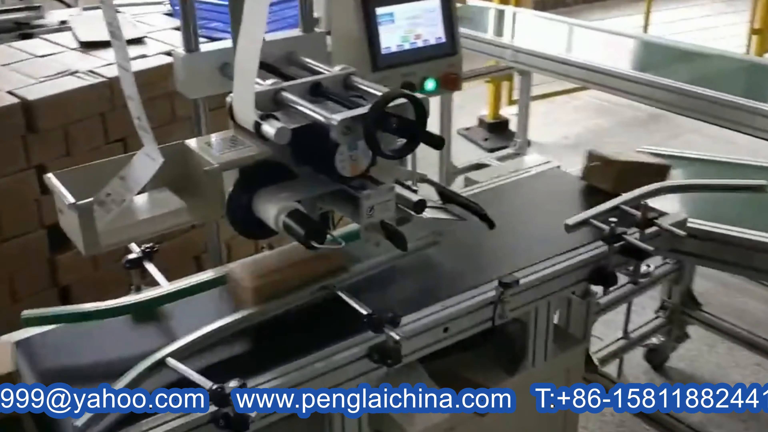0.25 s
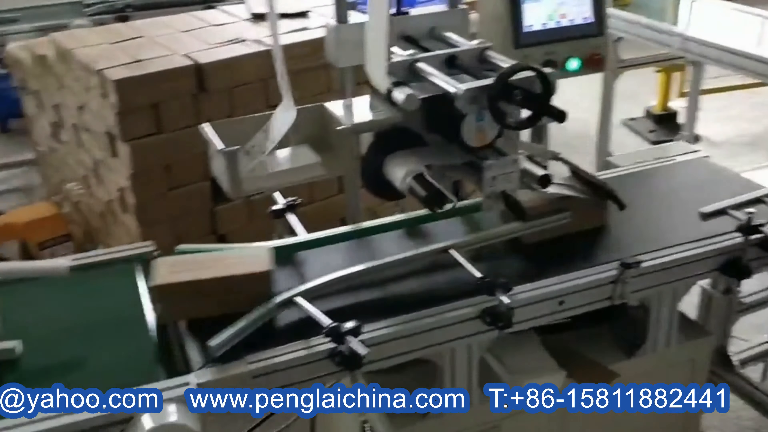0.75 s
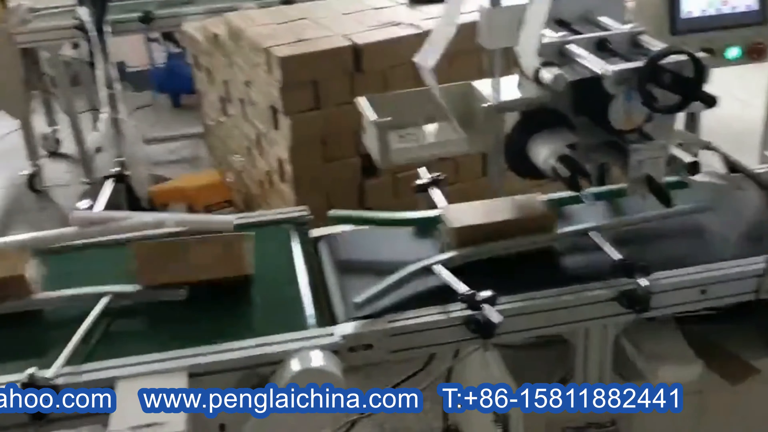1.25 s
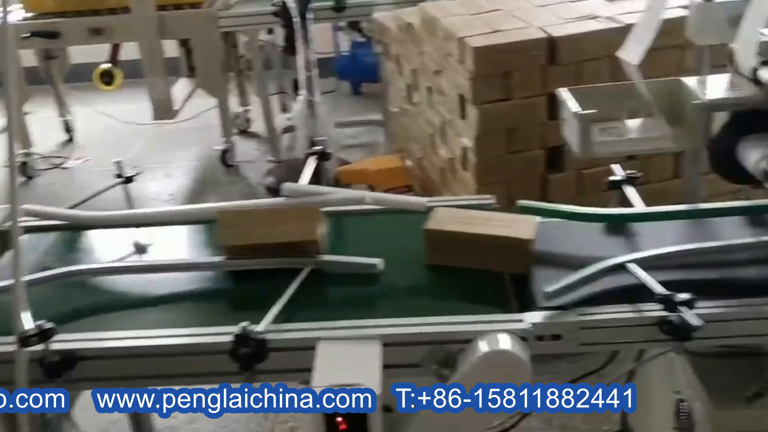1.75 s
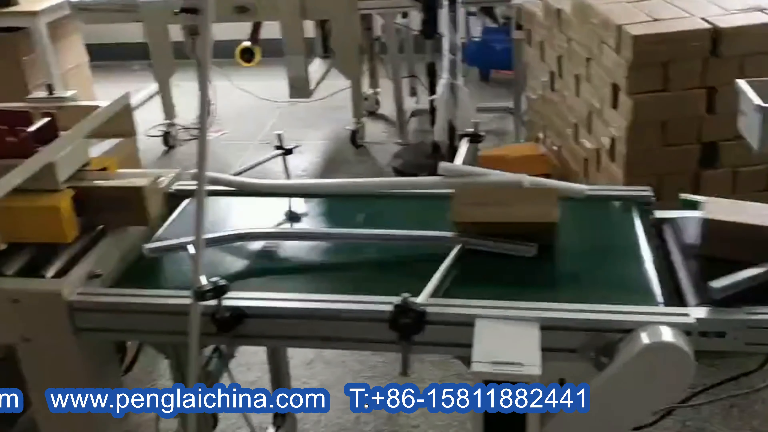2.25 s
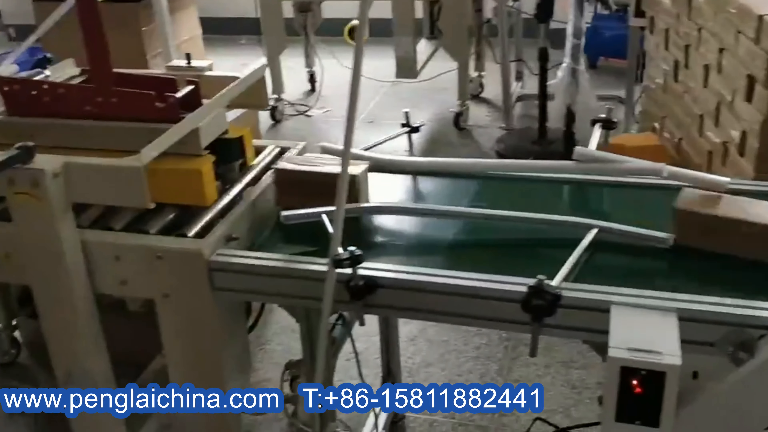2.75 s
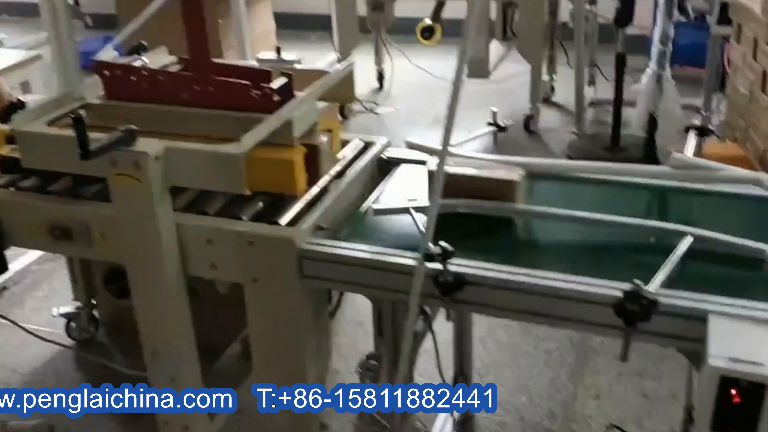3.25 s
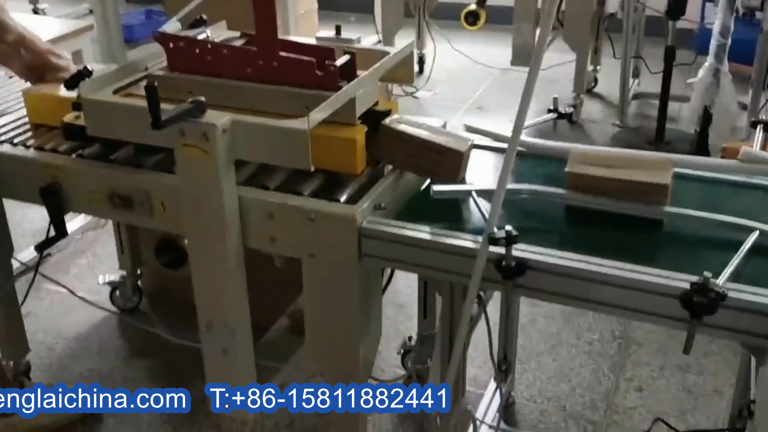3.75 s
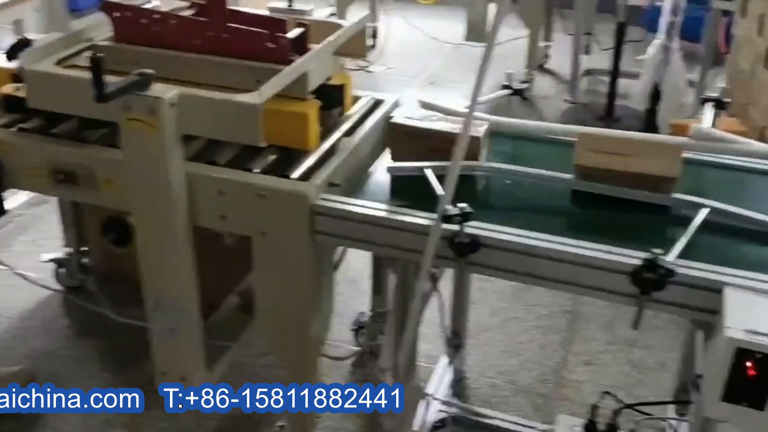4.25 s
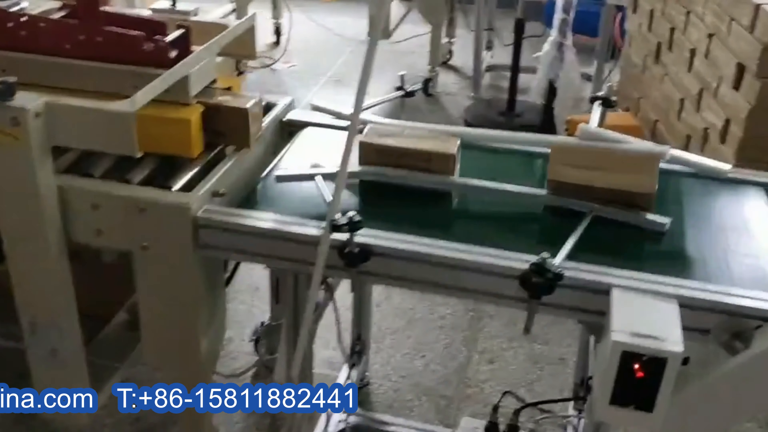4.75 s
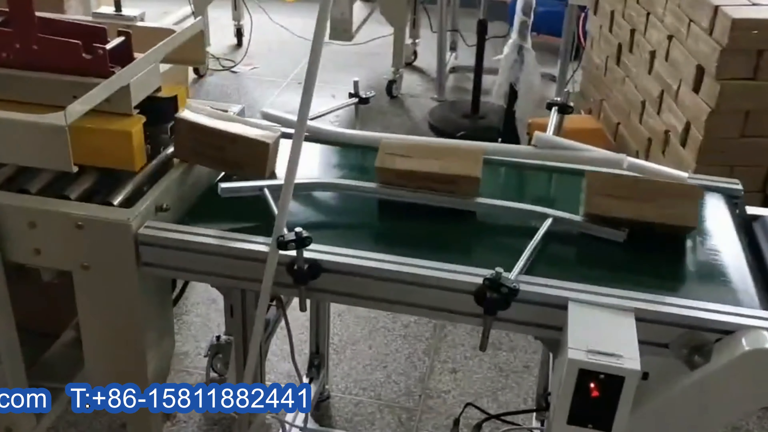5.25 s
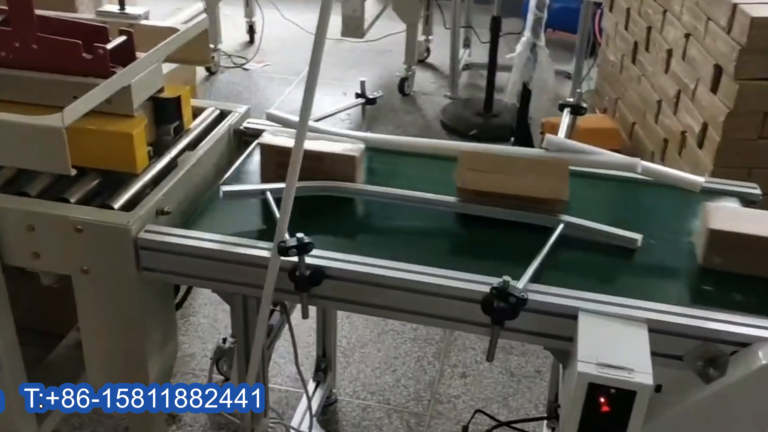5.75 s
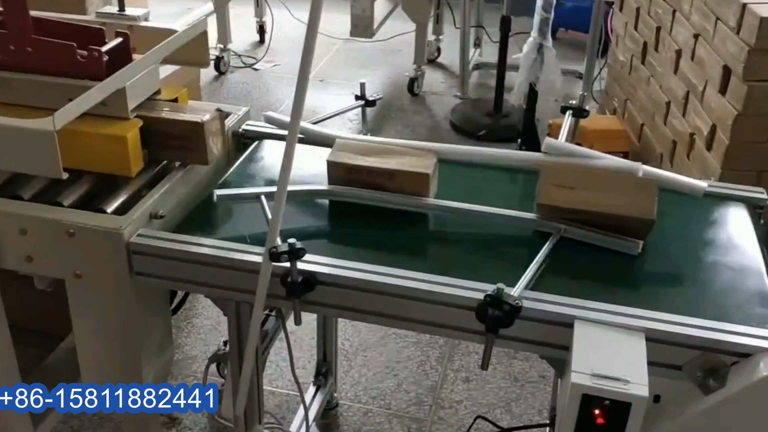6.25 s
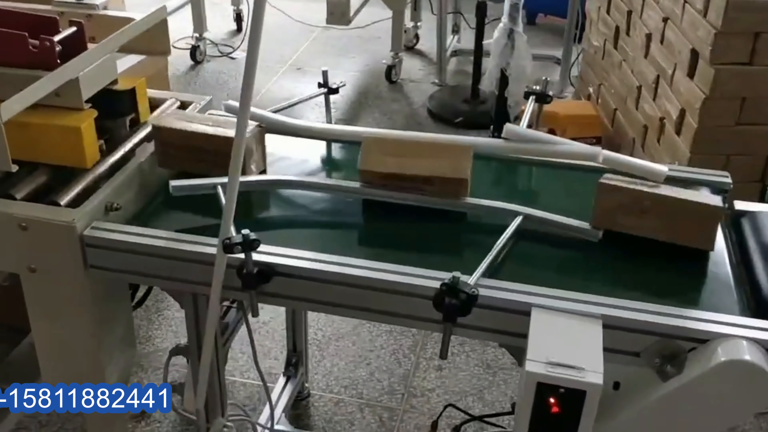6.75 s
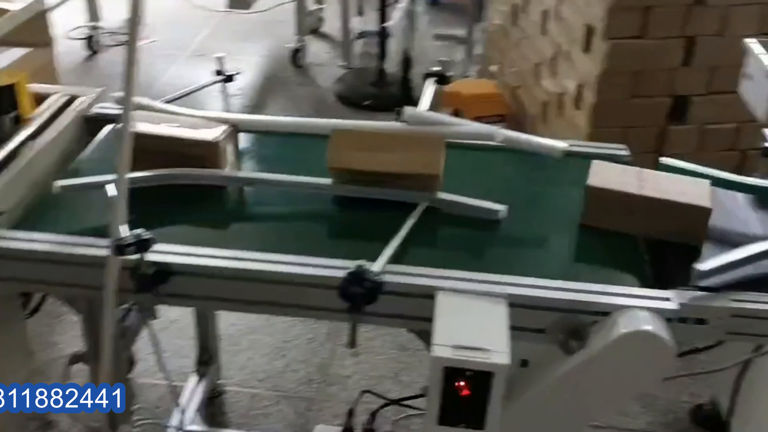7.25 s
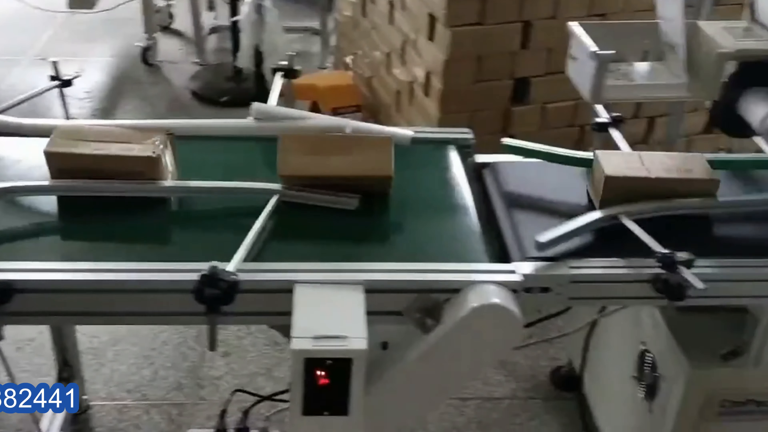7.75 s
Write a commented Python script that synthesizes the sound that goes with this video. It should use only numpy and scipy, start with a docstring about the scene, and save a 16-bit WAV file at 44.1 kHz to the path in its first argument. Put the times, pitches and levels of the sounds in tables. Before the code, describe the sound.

In an echoing factory hall, low conveyor rumble and a distant wash of machines open the scene with a carton knock. Close by, a case sealer then tears tape in successive long, hissing, rasping pulls with bright snaps. Hollow cartons knock and thump on belts and rails. When the pulling stops, knocks, thin belt squeaks and puffs of escaping air remain over the hall wash. One microphone, identical in both channels.

```python
"""Low conveyor noise and the wash of a factory hall come first, then a carton knocks and a case sealer starts up.
Close by, the sealer pulls tape off its rolls for box after box: slips of the glue hiss and rasp, snaps are
noise bursts. Belts squeak as narrow or broad bands of noise, cartons knock and thump, and the conveyors run
as wandering tones and coloured noise. Air valves puff and the hall washes farther off, with echoes.
One microphone, the same signal in both channels."""
import sys
import numpy as np
from scipy import signal
from scipy.fft import rfft, irfft
from scipy.io import wavfile
from scipy.ndimage import uniform_filter1d, map_coordinates

SR = 44100
rng = np.random.default_rng(int(sys.argv[2]) if len(sys.argv) > 2 else 0)


def unload_wav(signal):
    """Save mono or channel-first audio to the path in sys.argv[1] as 16-bit WAV at rate SR, clipped to [-1, 1]."""
    wavfile.write(
        sys.argv[1],
        SR,
        np.round(np.clip(np.atleast_2d(signal).T, -1, 1) * 32767).astype(np.int16),
    )


N = 352800
TIME = np.arange(N) / SR

# Film state: (time [s], tautness [0-1], screening of the peel line by the sealer's frame [0-1])
FILM_STATE = [(1.75, 0, 0.5), (1.84, 0, .2), (2.0, 0.05, 0), (2.1, 0, 0.4), (3.05, 0.33, 0.3),
              (3.25, 0.97, 0.25), (4.2, 1, 0.75), (4.65, 1, 1), (6.5, 1, 0.6)]
# Spectrum of the slack film: (frequency [Hz], relative density [dB per Hz])
SLACK_FILM_SPECTRUM = [(110, -55), (200, -13.5), (330, -5.5), (480, -7), (800, -4.5), (1250, 0.5),
                       (1700, 1), (2000, -6), (2500, -6), (3150, -3.5), (3800, -7), (4400, -9), (5000, -6),
                       (5500, -8), (6100, -32), (8000, -27)]
# Spectrum of the taut film, also the crack of a snap: (frequency [Hz], relative density [dB per Hz])
TAUT_FILM_SPECTRUM = [(400, -67), (560, -19), (740, -9.5), (1080, 0), (1290, -2.5), (1540, 0.7), (2000, -3),
                      (2280, 0.5), (2550, -3), (3100, -3.5), (3900, -10), (4500, -10.5), (5200, -9),
                      (6100, -24), (8000, -50)]
# Spectrum of the peel line, also the bright part of a snap: (frequency [Hz], relative density [dB per Hz])
PEEL_LINE_SPECTRUM = [(3000, -51), (5600, -6.5), (6400, 3), (7600, -1), (8700, -0.5), (11000, 1),
                      (12500, 2), (14400, -4), (15400, 1.5), (16000, -8)]
# What the sealer's frame lets through: (frequency [Hz], relative gain [dB])
FRAME_SCREEN = [(6500, -6.5), (7800, 7), (9500, 2.5), (11500, -1.3), (12500, -7), (13700, 1), (15500, 3)]
# One pull of tape per box: (start [s], stop [s], rise time constant [s], hiss of the peel line [dB],
# rasp of the film [dB], sag while pulling [dB/s], extra fall of the hiss after the stop [dB/s])
TAPE_PULLS = [(0.469, 1.698, 0.12, -28.5, -20, 2.5, 180), (1.821, 2.012, 0.027, -27.9, -23, 8, 170),
              (2.092, 3.032, 0.086, -28, -21, 3, 190), (3.149, 4.38, 0.1, -25, -21, 2, 150),
              (4.567, 5.781, 0.022, -26.5, -21, .7, 134), (5.905, 6.107, 0.023, -32, -25, 11, 130),
              (6.205, 6.47, 0.033, -30, -22, 25, 79)]
# Between pulls the tape still creeps; it fades in before the first pull and out after the last.
IDLE_HISS_DB, IDLE_RASP_DB, IDLE_FADE_S = -41, -44.5, 0.11
RASP_FALL_DB_PER_S = 87  # extra fall of the rasp after each stop


def tape():
    """Glue lets go in tiny slips that hiss at the peel line and shake the film; the roll judders as it unwinds."""
    taut, screened = curves(FILM_STATE)
    inside = np.minimum(TIME - TAPE_PULLS[0][0], TAPE_PULLS[-1][1] - TIME)
    threaded = np.clip(inside / IDLE_FADE_S + 1, 0, 1) ** 2
    creep = np.outer(amp([IDLE_HISS_DB, IDLE_RASP_DB]), threaded)
    # creep and pulls add in power
    hiss_gain, rasp_gain = np.sqrt(creep ** 2 + sum(gain ** 2 for gain in pulls()))

    judder = tone(hz=46.4, width_hz=5.8) * amp(1.7 * wobble(4.9))
    flutter_db = 0.81 * judder + 0.91 * wobble(32)

    # the hall smears part of the slips into smooth noise
    friction = blend(slips(rate=7000, spread_db=-1.5), rng.standard_normal(N), share=0.53)
    hiss = even_ripple(coloured(friction, PEEL_LINE_SPECTRUM), spacing_hz=1882, strength=0.21)
    behind_frame = coloured(hiss, FRAME_SCREEN)
    hiss = hiss + np.clip(screened, 0, 1) * (behind_frame - hiss)

    slack = coloured(friction, SLACK_FILM_SPECTRUM) + amp(-11.5) * chirps(hz=4720, t60=0.0048)
    film = blend(slack, rush(TAUT_FILM_SPECTRUM, patchy_db=1.5), taut)
    rasp_db = 0.5 * flutter_db + 0.85 * wobble(15)
    return hiss_gain * amp(flutter_db) * hiss + rasp_gain * amp(rasp_db) * film


def pulls():
    """For each pull, the gains of hiss and rasp: they rise, sag slowly and run down with the roll."""
    for start, stop, rise, hiss_db, rasp_db, sag, fall in TAPE_PULLS:
        age = np.maximum(TIME - start, 0)
        shape = (1 - np.exp(-age / rise)) * amp(-sag * age)
        run_down_db = np.outer([fall, RASP_FALL_DB_PER_S], np.maximum(TIME - stop, 0))
        yield shape * amp(np.array([[hiss_db], [rasp_db]]) - run_down_db)


def slips(rate, spread_db):
    """Tiny ruptures of the glue, about rate a second, of uneven size, at rms 1."""
    happens = rng.random(N) < rate / SR
    size = rng.standard_normal(N) * amp(spread_db * rng.standard_normal(N))
    return unit(happens * size)


def chirps(hz, t60):
    """Stretches of slack film slip in random clumps and ring briefly at one pitch, at rms 1."""
    t = np.arange(SR // 20) / SR
    ring = np.sin(2 * np.pi * hz * t) * np.exp(-np.log(1000) * t / t60)
    clumps = amp(5.9 * wobble(90))
    return unit(signal.fftconvolve(clumps * rng.standard_normal(N), ring)[:N])


# Tape snapping off the roll: (time [s], level [dB], film crack against the snap [dB], t60 [s])
TAPE_SNAPS = [(0.487, -28, 6, .08), (1.8254, -26, 6, 0.094), (3.165, -21.5, -15, 0.052),
              (3.239, -19, -7, 0.066), (3.2806, -18, -6, 0.051), (3.335, -16, -4, 0.03),
              (4.588, -19.5, -4, 0.068), (4.611, -16, -9, 0.059), (4.9128, -19, -8, 0.064),
              (6.0284, -20.5, 7, 0.071)]


def snaps():
    """The tape jerks free close by: a bright snap and a crack of the taut film, dying away together."""
    track = np.zeros(N)
    for s, db, crack_db, t60 in TAPE_SNAPS:
        crack = amp(crack_db) * noise(TAUT_FILM_SPECTRUM)
        add(track, s, amp(db) * burst(t60, attack=0.0016) * (noise(PEEL_LINE_SPECTRUM) + crack))
    return track


# Belts, rails and wipe-down rollers rubbing:
# (time [s], length [s], centre [Hz], width at half amplitude [Hz], level [dB])
RUBBING_SQUEAKS = [(1.825, 0.19, 1560, 1100, -24.5), (2.197, 0.42, 990, 320, -30),
                   (5.933, 0.24, 2070, 850, -28), (6.223, 0.16, 1960, 550, -27.5),
                   (6.89, 0.078, 3400, 70, -43), (6.955, 0.1, 4300, 130, -43.5),
                   (7.03, 0.16, 4480, 150, -51), (7.108, 0.69, 666, 20, -39), (7.17, 0.26, 4170, 260, -46),
                   (7.35, .14, 4420, 280, -48), (7.498, 0.14, 4100, 400, -50), (7.506, 0.17, 610, 570, -30),
                   (7.752, 0.22, 5420, 30, -47)]


def squeaks():
    """Rubbing close by excites one resonance: a broad one swishes, a narrow one sings."""
    track = np.zeros(N)
    for s, length, centre, width, db in RUBBING_SQUEAKS:
        ring = unit(filtered(rng.standard_normal(SR), lambda hz: 1 / (1 + (2 * (hz - centre) / width) ** 4)))
        swell = np.sqrt(np.abs(np.sin(np.linspace(0, np.pi, int(length * SR)))))[:SR]
        add(track, s, amp(db) * swell * ring[:len(swell)])
    return track


# Cartons hitting belt and rails: (time [s], level [dB], thump against the knock [dB],
# rail clack against the knock [dB], t60 of the ring [s])
CARTON_KNOCKS = [(0.189, -26, -20, -22, 0.44), (0.4708, -17.5, -16, 0, 0.055), (1.033, -16, -7, -19, 0.05),
                 (2.395, -22, -7, -12, .15), (4.18, -31.5, 1, -14, 0.16), (4.329, -22.5, -3, -12, 0.36),
                 (4.388, -20, -7, -18, 0.41), (4.549, -23.5, -12, -1, 0.26), (5.529, -22, -9, -6, 0.29),
                 (5.67, -35, -4, -10, 0.18), (5.749, -29, 1, -12, 0.17), (6.248, -38, -12, -5, 0.27),
                 (6.962, -24, -12, 1, 0.44), (7.084, -20, 0.5, -3, 0.48), (7.317, -26, -26, 1, 0.68),
                 (7.542, -18, -8, -12, 0.28), (7.642, -19, -12, -14, 0.17)]
# Spectrum of the hollow carton: (frequency [Hz], relative density [dB per Hz])
CARTON_SPECTRUM = [(150, -38), (300, -9), (480, 3.5), (660, -1), (1000, -4), (1600, -1.5), (2800, -11),
                   (4000, -25), (9000, -64)]
# Spectrum of the thump: (frequency [Hz], relative density [dB per Hz])
THUMP_SPECTRUM = [(40, -30), (90, -13), (190, -6.5), (300, 6.5), (600, 5), (1500, -60)]
# Spectrum of the rail clack: (frequency [Hz], relative density [dB per Hz])
CLACK_SPECTRUM = [(500, -29), (1000, 13), (1700, 5), (2700, -12), (3500, -9), (7000, -40)]


def knocks():
    """A hollow carton lands with a short knock, a thump and a clack of the rail; the hall rings on."""
    track = np.zeros(N)
    for s, db, thump_db, clack_db, t60 in CARTON_KNOCKS:
        blow = burst(0.034, attack=0.001) + 0.33 * burst(t60, attack=0.0061)
        thump = amp(thump_db) * noise(THUMP_SPECTRUM)
        clack = amp(clack_db) * noise(CLACK_SPECTRUM)
        add(track, s, amp(db) * blow * (noise(CARTON_SPECTRUM) + thump + clack))
    return track


# Heard level of the low conveyor noise, which drops after 3.2 s, and of the drone:
# (time [s], bass level [dB], roller and belt drone level [dB])
CONVEYOR_LEVELS = [(0, -36, -51), (.16, -37.5, -41), (.22, -36, -31), (1.1, -41, -29), (1.7, -36.5, -32.5),
                   (2.08, -41.5, -34.5), (2.3, -41, -27.5), (3.16, -37, -34), (3.52, -59, -50),
                   (5.1, -61, -41), (8, -57, -44)]
# A carton rides over rollers and loads the belt: (time [s], length [s], frame rumble [dB],
# motor hum [dB], roller drone [dB])
CARTON_RIDES = [(3.693, 0.23, -59, -64, -32.5), (4.155, 0.29, -40.5, -54, -29.5),
                (4.44, .21, -43.5, -54, -36), (5.477, 0.42, -50.5, -66, -35),
                (6.215, 0.15, -40.5, -56, -31), (6.344, 0.53, -45, -68, -39.5),
                (6.948, 0.26, -47.5, -59, -31.5), (7.144, 0.45, -69, -51, -38),
                (7.488, .32, -40, -67, -37.5), (7.78, 0.23, -46.5, -57, -62)]
# Spectrum of the motors: (frequency [Hz], relative density [dB per Hz])
MOTOR_SPECTRUM = [(20, -22), (48, -30), (68, -0.5), (100, -0.5), (135, -1), (200, -11.5), (400, -45)]
# Spectrum of the frame rumble: (frequency [Hz], relative density [dB per Hz])
RUMBLE_SPECTRUM = [(90, -43), (140, -14), (172, 2), (215, -1), (245, 2.2), (330, 1.5), (400, 0), (520, -19),
                   (900, -60)]
# Spectrum of the roller and belt drone: (frequency [Hz], relative density [dB per Hz])
DRONE_SPECTRUM = [(200, -53), (330, -12), (460, -0.5), (550, -6.5), (660, -2.5), (830, -1.5), (1000, -2),
                  (1300, -9), (2500, -54)]
# The sealer's side-belt drive: (time [s], level [dB])
SEALER_DRIVE_LEVEL = [(0, -46), (2.9, -58), (3.4, -43), (4.3, -41.5), (5.0, -42), (5.5, -39.5), (6.1, -45),
                      (6.7, -50.5), (8, -69)]
# Spectrum of that drive: (frequency [Hz], relative density [dB per Hz])
SEALER_DRIVE_SPECTRUM = [(290, -43), (335, -17), (370, -2), (440, -2), (500, -25), (600, -31)]
MOTOR_DB = -12.5  # motor hum against the frame rumble, apart from the rides
RIDE_EDGE_S = 0.05  # a carton runs on and off this fast
WHINE_HZ, WHINE_DB = 1067, -52


def conveyors():
    """Motors hum, frames rumble, rollers drone, louder under cartons; a drive growls and a gearbox whines."""
    bass_db, drone_db = curves(CONVEYOR_LEVELS)
    power = amp([bass_db, bass_db + MOTOR_DB, drone_db]) ** 2
    for s, length, *levels_db in CARTON_RIDES:
        load = np.clip(np.minimum(TIME - s, s + length - TIME) / RIDE_EDGE_S, 0, 1)
        power = power + np.outer(amp(levels_db), load) ** 2
    rumble_gain, motor_gain, drone_gain = np.sqrt(power)

    motor_tone = amp(-8 + 3.5 * wobble(4.8)) * tone(hz=97.8, width_hz=3.6)
    motor = motor_gain * amp(2.0 * wobble(9)) * (noise(MOTOR_SPECTRUM, size=N) + motor_tone)
    frame_tone = amp(-12 + 4.0 * wobble(6.9)) * tone(hz=186.5, width_hz=6)
    rumble = rumble_gain * amp(1.4 * wobble(22)) * (rush(RUMBLE_SPECTRUM, patchy_db=2.5) + frame_tone)
    drone = drone_gain * amp(2.5 * wobble(12)) * rush(DRONE_SPECTRUM, patchy_db=3.0)
    drive_db, = curves(SEALER_DRIVE_LEVEL)
    drive = amp(drive_db + 1.5 * wobble(7)) * noise(SEALER_DRIVE_SPECTRUM, size=N)
    whine = amp(WHINE_DB + 5.2 * wobble(6)) * tone(WHINE_HZ, width_hz=11)
    return motor + rumble + drone + drive + whine


# Air valves venting: (time [s], level [dB], t60 [s])
VALVE_PUFFS = [(6.8144, -31.5, 0.22), (6.904, -41, .06), (6.95, -47, .06), (7.0733, -34, 1),
               (7.471, -30.5, 0.51)]
# Spectrum of the escaping air: (frequency [Hz], relative density [dB per Hz])
AIR_SPECTRUM = [(2000, -27), (4500, 6), (6300, -10), (8500, 5), (11500, 5), (13000, 1), (15400, 2.5)]


def valves():
    """Farther off, each valve clicks and lets out a fading puff of air, its treble evenly rippled."""
    track = np.zeros(N)
    for s, db, t60 in VALVE_PUFFS:
        puff = even_ripple(noise(AIR_SPECTRUM), spacing_hz=1880, strength=0.19)
        fade = burst(0.029, attack=0.0014) + 0.65 * burst(t60, attack=0.0065)
        add(track, s, amp(db) * fade * puff)
    return track


# The hall along the line: (time [s], level [dB], nearness to the sealer [0-1])
HALL_POSITION = [(0, -32.5, 0.17), (.4, -31, 0.04), (3, -31.5, 0.28), (6.6, -30.5, 0.62), (6.9, -34.5, 1),
                 (7.1, -31, 0.94), (7.35, -32, 0.92), (7.7, -29.5, 0.93), (8, -34, 1)]
# The hall as heard by the labeller: (frequency [Hz], relative density [dB per Hz])
LABELLER_SPECTRUM = [(300, -43), (560, -3.5), (1050, 0), (1500, -3), (1900, -8.5), (2300, -9), (2800, -7.5),
                     (3080, -5), (3500, -10), (5200, -14), (6200, -29.5), (7200, -19), (7600, -28),
                     (9500, -27.5), (15500, -35)]
# The hall as heard by the sealer: (frequency [Hz], relative density [dB per Hz])
SEALER_SPECTRUM = [(400, -28.5), (780, -11), (980, -2), (1500, -3), (2100, -1.5), (2800, -1.5), (3150, -14),
                   (3550, -43), (4200, -17.5), (4900, -26.5), (5300, -18.5), (5900, -52), (7500, -31.5),
                   (9300, -31), (11500, -28), (15500, -32)]
BANDED_ABOVE_HZ = 3300  # the hall's treble above this frequency has uneven bands


def hall():
    """The distant wash of all machines changes colour along the line; its treble has uneven bands."""
    level_db, near_sealer = curves(HALL_POSITION)
    by_labeller = rush(LABELLER_SPECTRUM, patchy_db=2.25)
    by_sealer = rush(SEALER_SPECTRUM, patchy_db=1.0)
    wash = blend(by_labeller, by_sealer, near_sealer)
    treble = filtered(wash, lambda hz: hz > BANDED_ABOVE_HZ)
    banded = drifting_comb(treble, strength=0.71, reach_s=0.0035, count=4)
    return amp(level_db + 0.5 * wobble(14)) * (wash - treble + banded)


def drifting_comb(x, strength, reach_s, count):
    """Short echoes of randomly drifting strength comb the sound into uneven, shifting bands."""
    delays = rng.uniform(0.00122, reach_s, count)
    echoes = sum(wobble(0.868) * np.pad(x, (int(d * SR), 0))[:N] for d in delays)
    return (x + strength * echoes / np.sqrt(count)) / np.sqrt(1 + strength ** 2)


def even_ripple(x, spacing_hz, strength):
    """An even ripple across the treble, probably from the microphone, made by one short delay; rms 1."""
    return unit(filtered(x, lambda hz: 1 + strength * np.exp(-2j * np.pi * hz / spacing_hz)))


def amp(db):
    """Decibels to gain."""
    return np.exp(np.log(10) / 20 * np.asarray(db))


def unit(x):
    """Scale to rms 1."""
    return x / np.sqrt(np.mean(x ** 2) + 1e-20)


def curves(rows):
    """One value per sample for each column after the time."""
    s, *cols = np.transpose(rows)
    return [np.interp(TIME, s, c) for c in cols]


def wobble(rate):
    """A smooth random curve, rate knots a second."""
    knots = rng.standard_normal(int(N * rate / SR) + 4)
    fine = np.arange(0, len(knots) - 1, 0.125)
    return np.interp(TIME * rate, fine, map_coordinates(knots, [fine]))


def filtered(x, response):
    """x times a response of frequency."""
    return irfft(rfft(x) * response(np.fft.rfftfreq(len(x), 1 / SR)), len(x))


def coloured(x, spectrum):
    """x through a (frequency [Hz], level [dB]) spectrum, at rms 1."""
    f, db = np.transpose(spectrum)
    return unit(filtered(x, lambda hz: amp(np.interp(np.log(hz + 1), np.log(f), db))))


def noise(spectrum, size=SR // 2):
    """Coloured noise of rms 1, half a second unless told otherwise."""
    return coloured(rng.standard_normal(size), spectrum)


def rush(spectrum, patchy_db):
    """Coloured noise of rms 1 with drifting patches of gain in time and frequency."""
    z = signal.stft(rng.standard_normal(N), nperseg=512)[2]
    field = uniform_filter1d(rng.standard_normal(z.shape), size=5, axis=0)
    field = uniform_filter1d(field, size=12, axis=1)
    patchy = signal.istft(z * amp(patchy_db * unit(field)))[1][:N]
    return coloured(patchy, spectrum)


def tone(hz, width_hz):
    """A sine of rms 1 whose pitch wanders by about its width."""
    pitch = hz + width_hz * wobble(2 * width_hz)
    return np.sqrt(2) * np.sin(2 * np.pi * np.cumsum(pitch) / SR)


def blend(a, b, share):
    """Cross-fade from a to b at constant power."""
    share = np.clip(share, 0, 1)
    return np.sqrt(1 - share) * a + np.sqrt(share) * b


def burst(t60, attack):
    """Half a second of a blow's envelope: a quick rise and an exponential fall."""
    t = TIME[:SR // 2]
    return (1 - np.exp(-t / attack)) * np.exp(-np.log(1000) * t / t60)


def add(track, s, sound):
    """Mix a short sound into the track at s seconds."""
    part = track[round(s * SR):][:len(sound)]
    part += sound[:len(part)]


def scene():
    """The whole line, alike in both channels; the distant sounds carry echoes."""
    near = tape() + snaps() + squeaks()
    far = drifting_comb(hall() + valves(), strength=0.37, reach_s=0.011, count=8)
    line = near + far + conveyors() + knocks()
    return np.array([line, line])


TOP_HZ = 15550  # band limit of the microphone channel


def record(dry):
    """The microphone channel rounds off the highest peaks and keeps nothing above its band limit."""
    ceiling = amp(-11.0)
    rounded = dry / (1 + (dry / ceiling) ** 6) ** (1 / 6)
    return np.array([filtered(channel, lambda hz: hz < TOP_HZ) for channel in rounded])


dry = scene()
out = record(dry)
unload_wav(out)
```